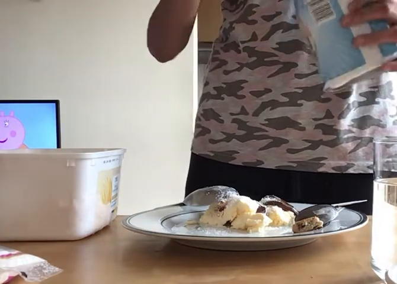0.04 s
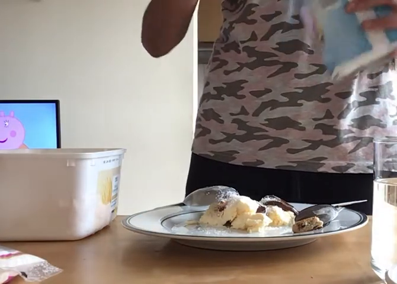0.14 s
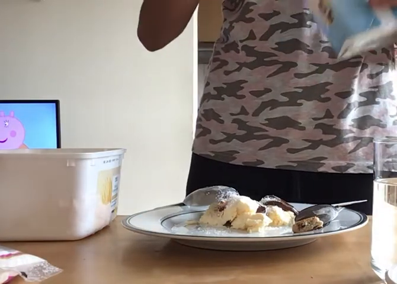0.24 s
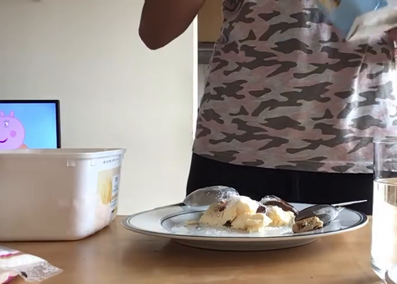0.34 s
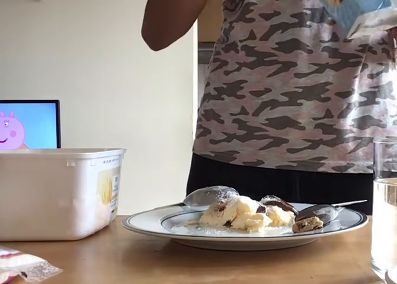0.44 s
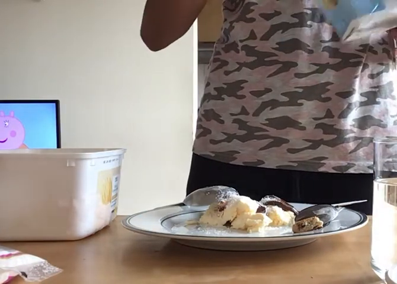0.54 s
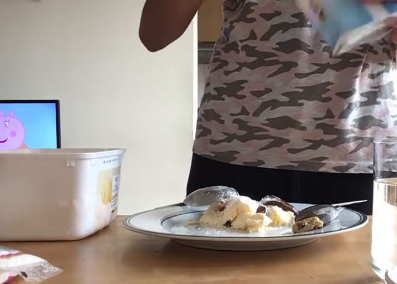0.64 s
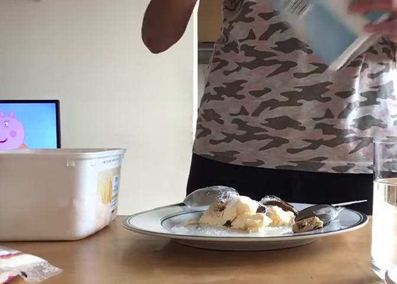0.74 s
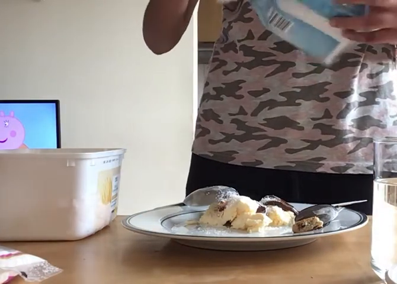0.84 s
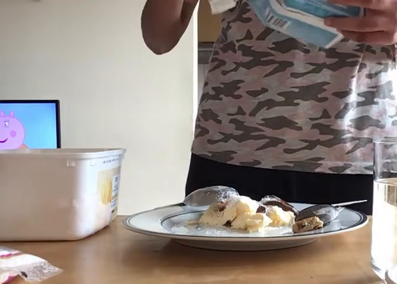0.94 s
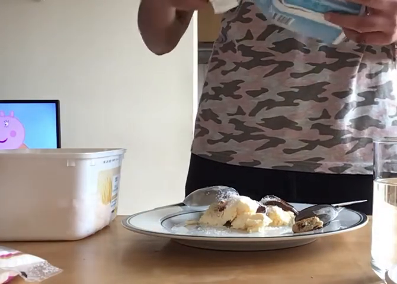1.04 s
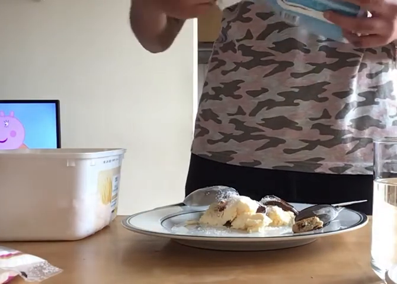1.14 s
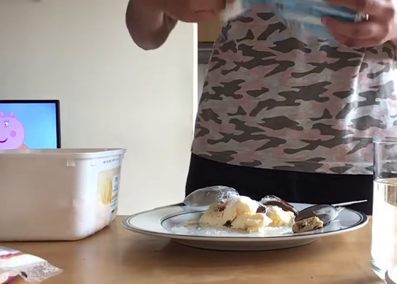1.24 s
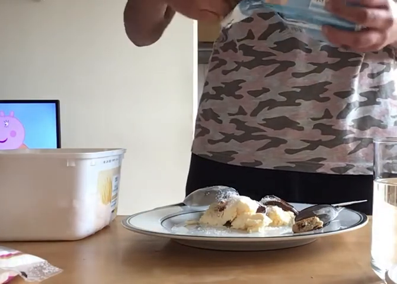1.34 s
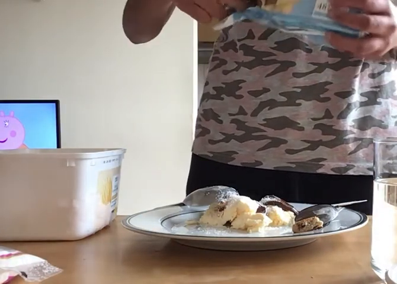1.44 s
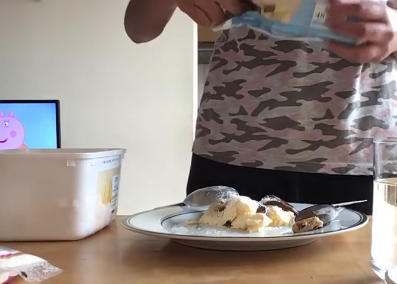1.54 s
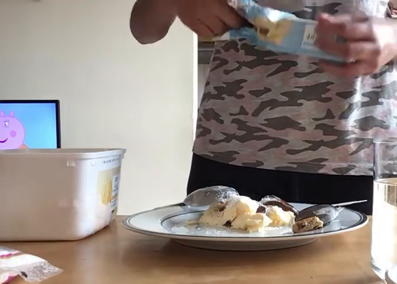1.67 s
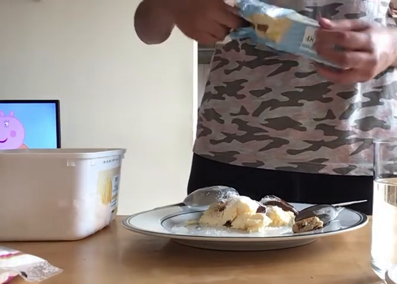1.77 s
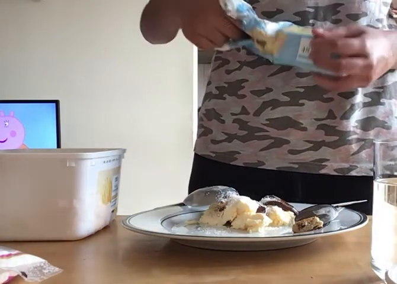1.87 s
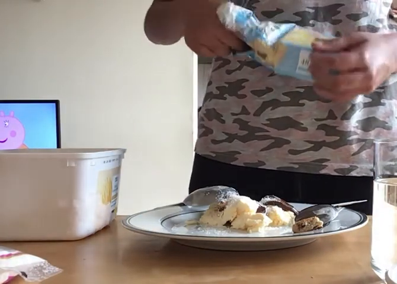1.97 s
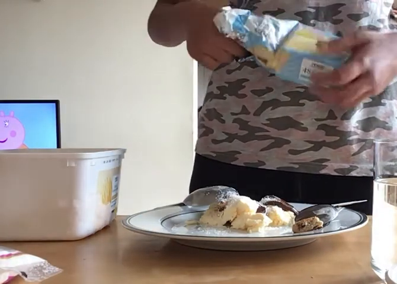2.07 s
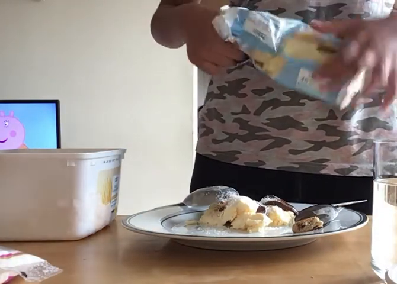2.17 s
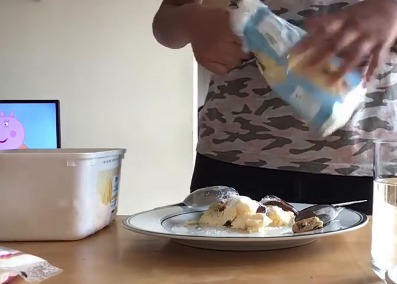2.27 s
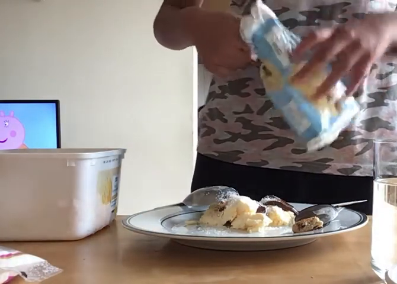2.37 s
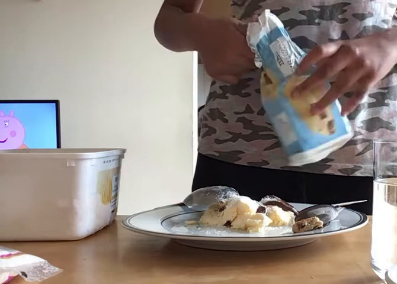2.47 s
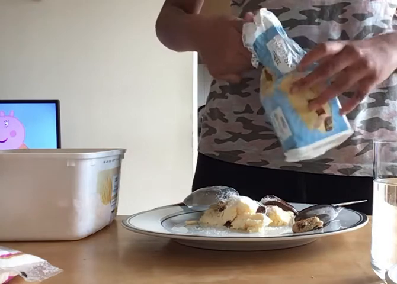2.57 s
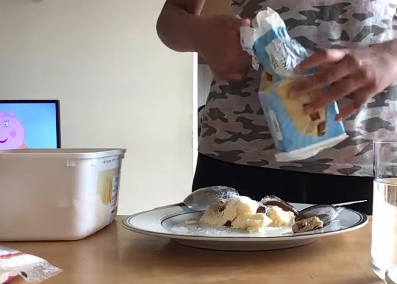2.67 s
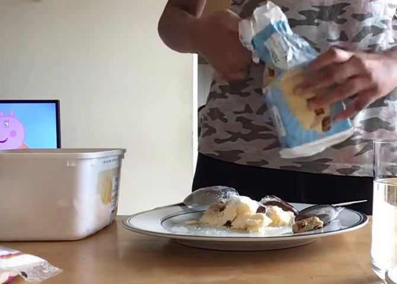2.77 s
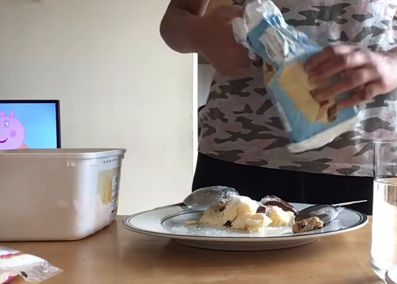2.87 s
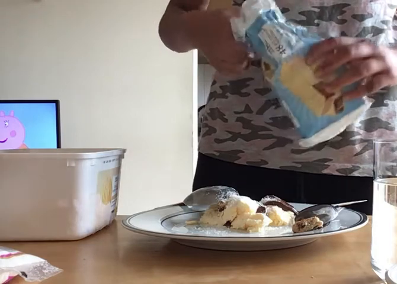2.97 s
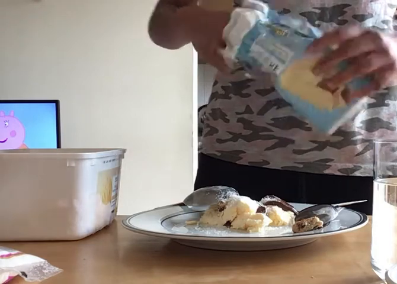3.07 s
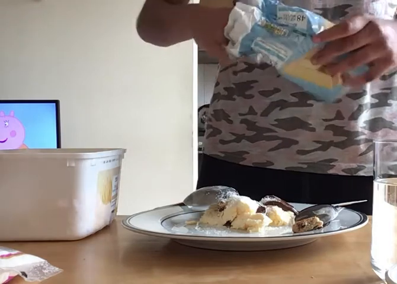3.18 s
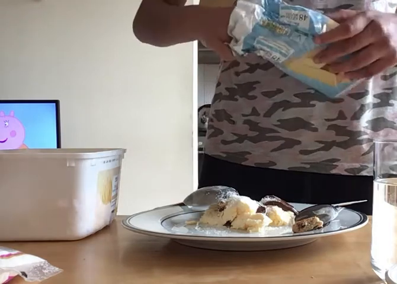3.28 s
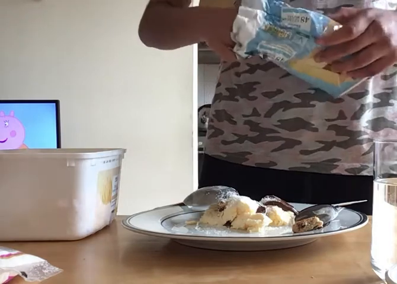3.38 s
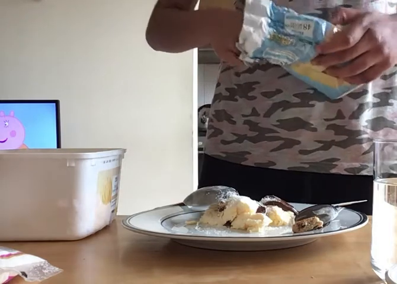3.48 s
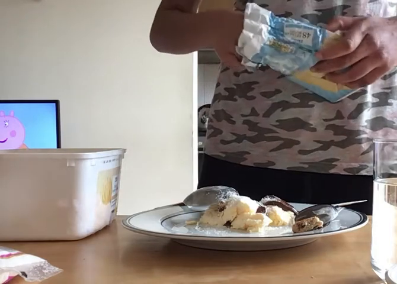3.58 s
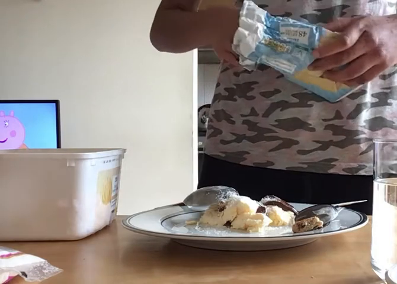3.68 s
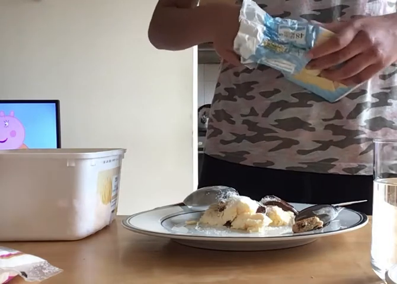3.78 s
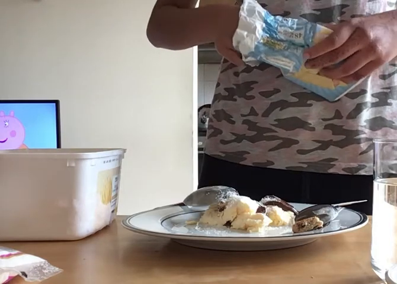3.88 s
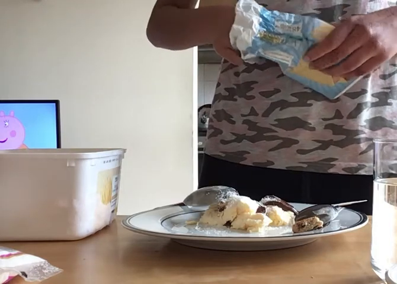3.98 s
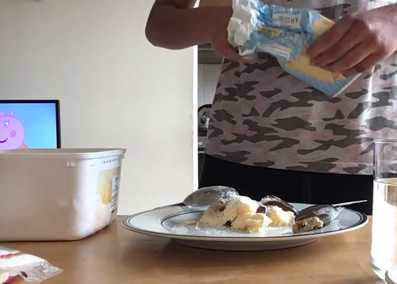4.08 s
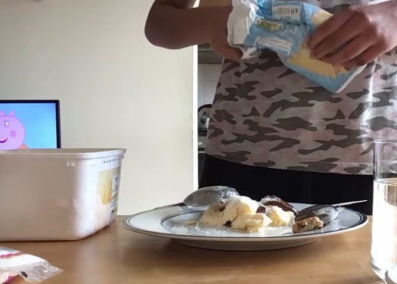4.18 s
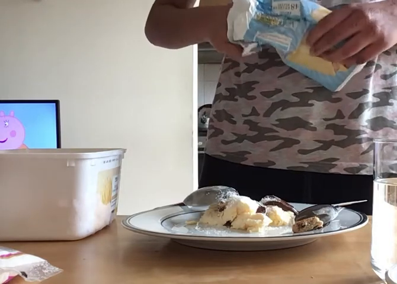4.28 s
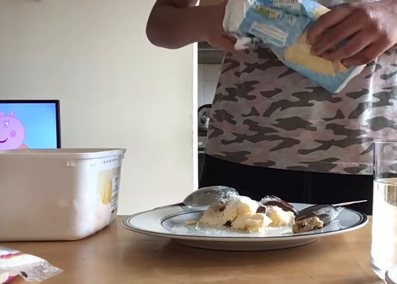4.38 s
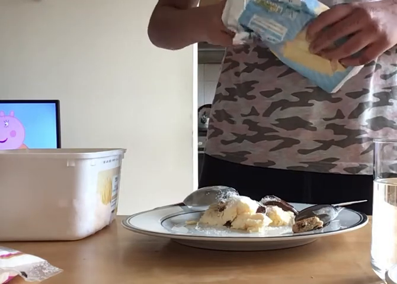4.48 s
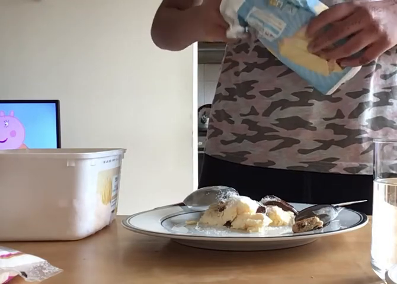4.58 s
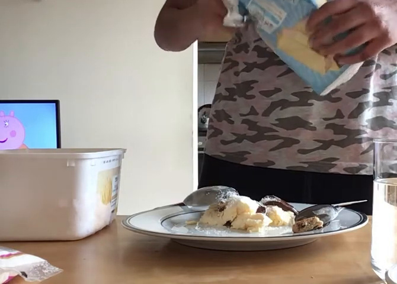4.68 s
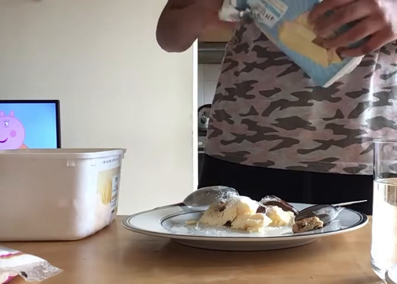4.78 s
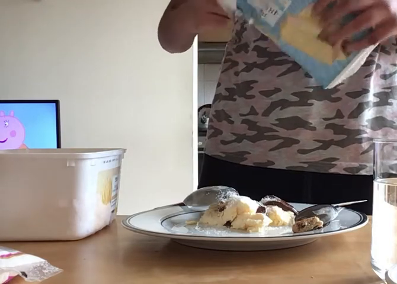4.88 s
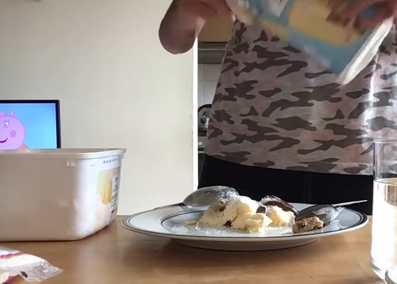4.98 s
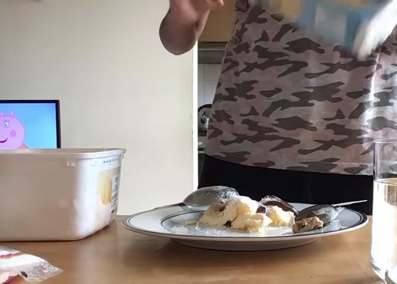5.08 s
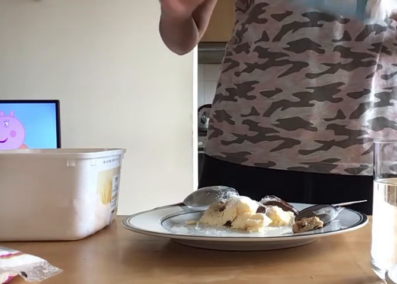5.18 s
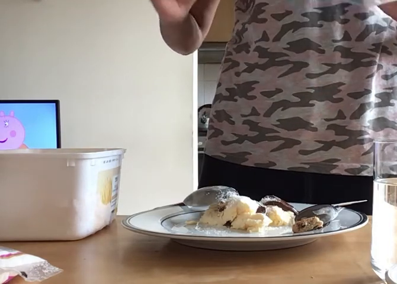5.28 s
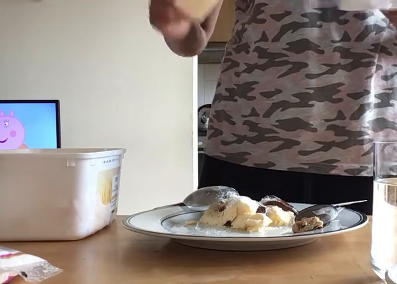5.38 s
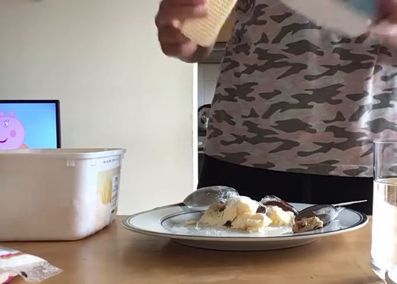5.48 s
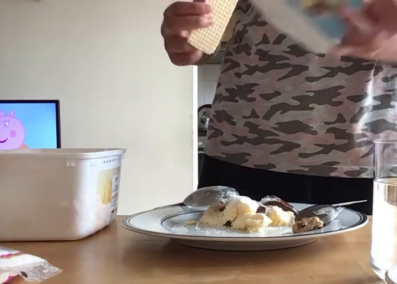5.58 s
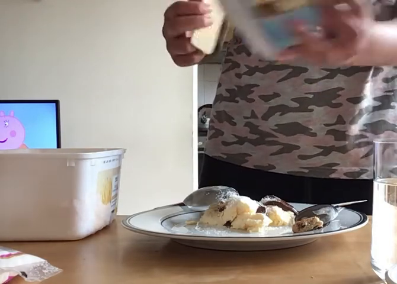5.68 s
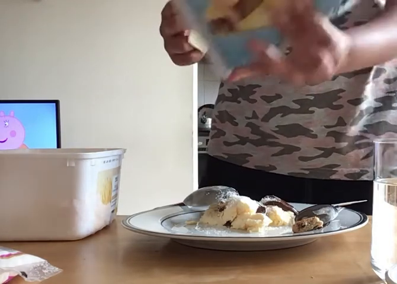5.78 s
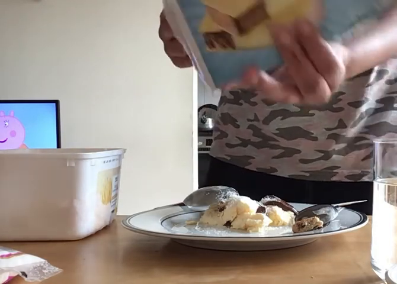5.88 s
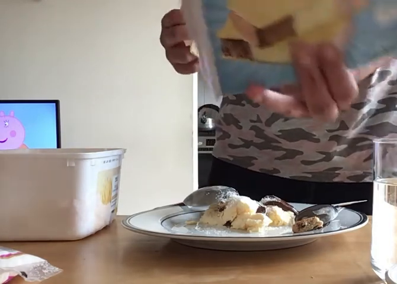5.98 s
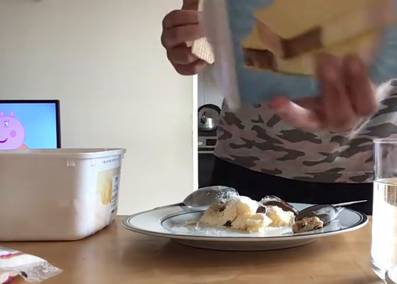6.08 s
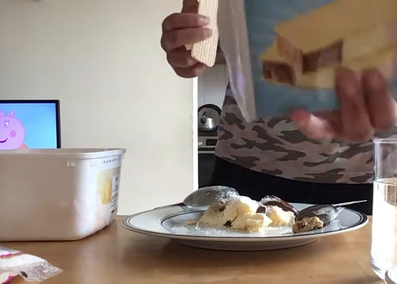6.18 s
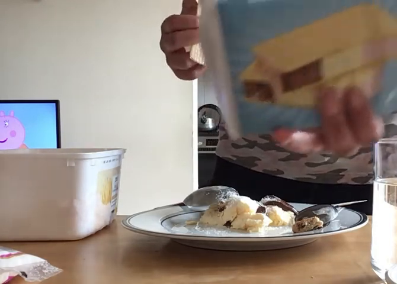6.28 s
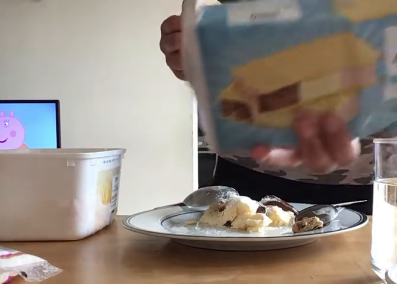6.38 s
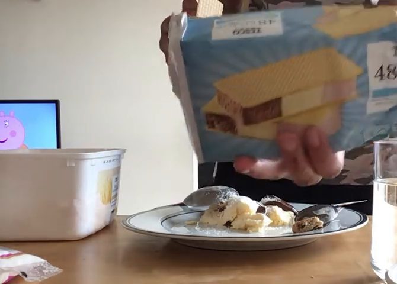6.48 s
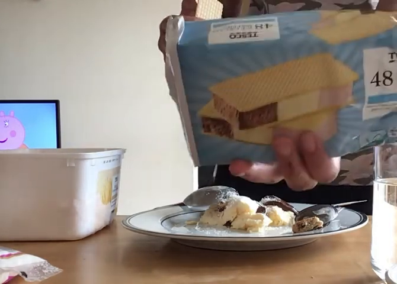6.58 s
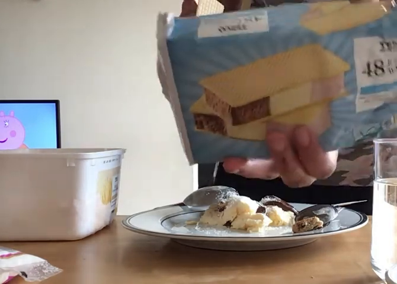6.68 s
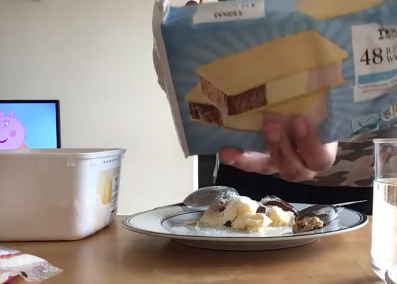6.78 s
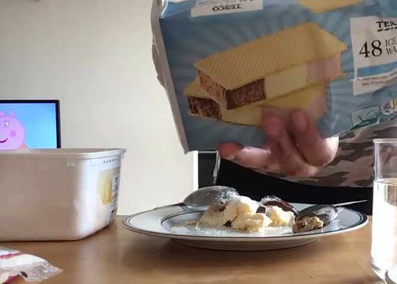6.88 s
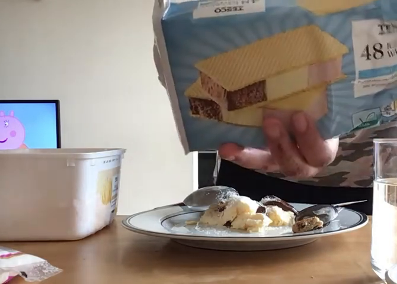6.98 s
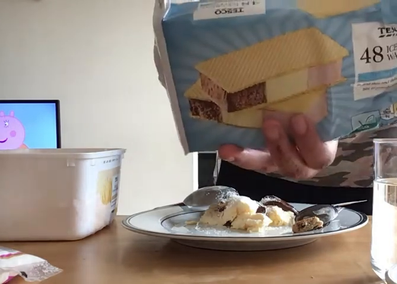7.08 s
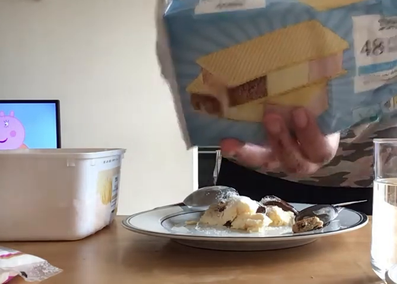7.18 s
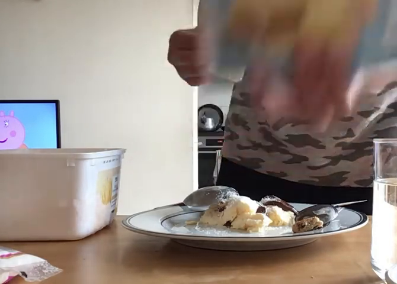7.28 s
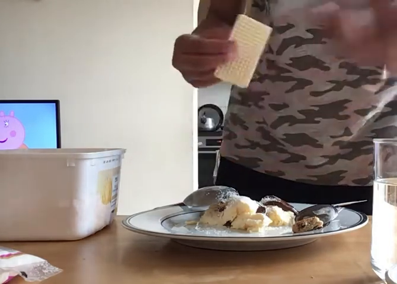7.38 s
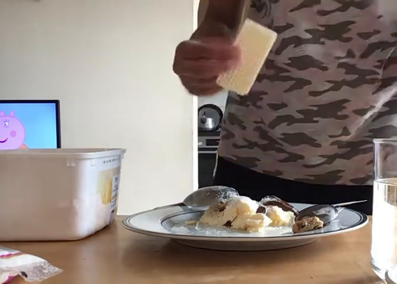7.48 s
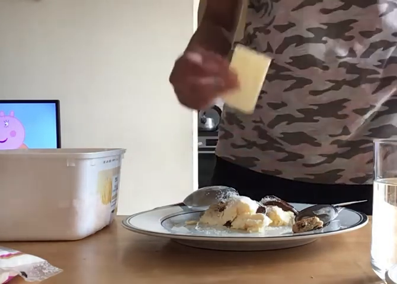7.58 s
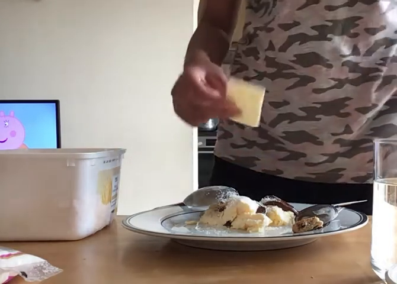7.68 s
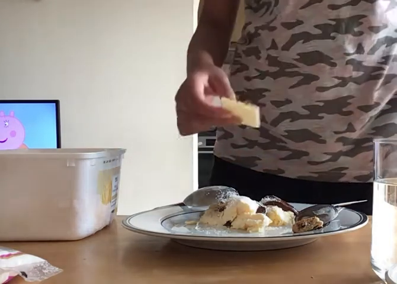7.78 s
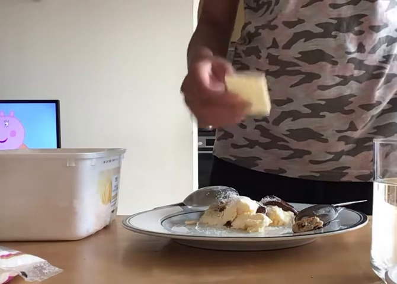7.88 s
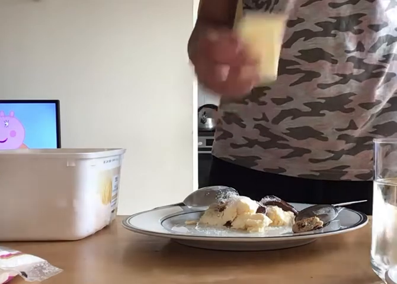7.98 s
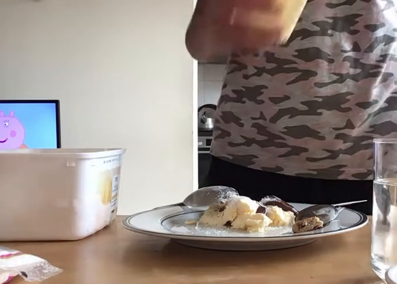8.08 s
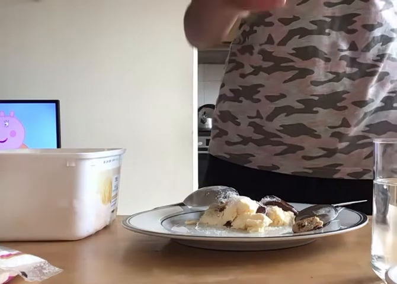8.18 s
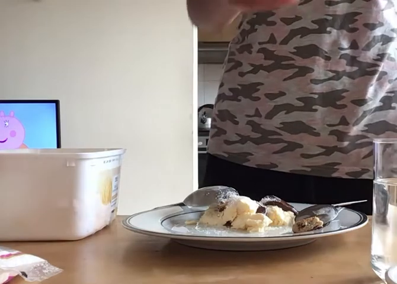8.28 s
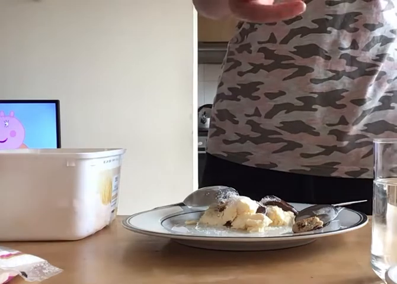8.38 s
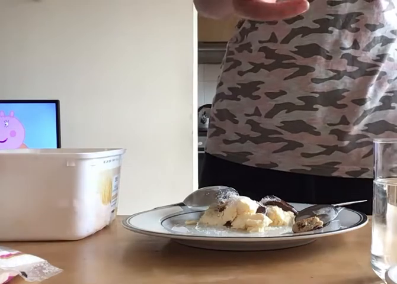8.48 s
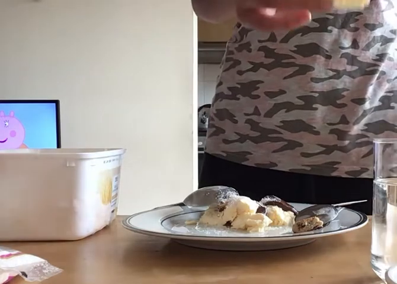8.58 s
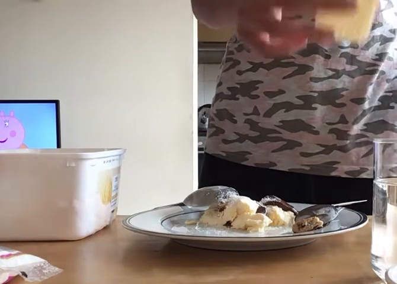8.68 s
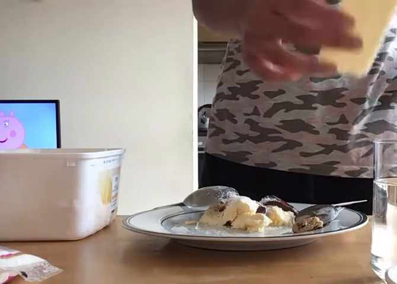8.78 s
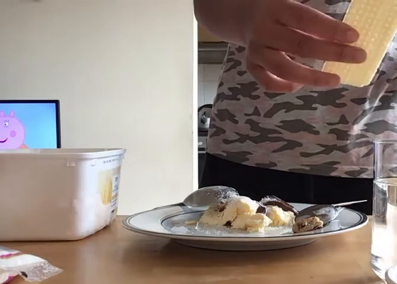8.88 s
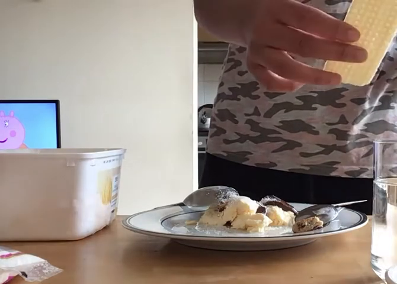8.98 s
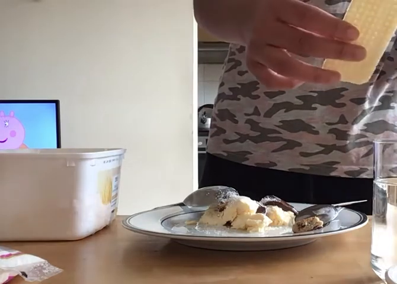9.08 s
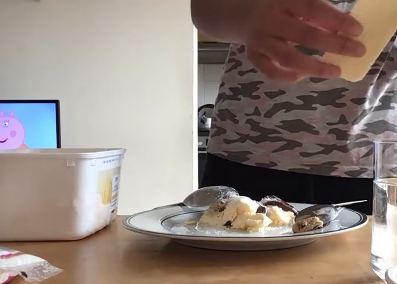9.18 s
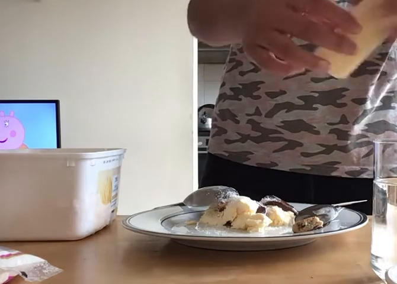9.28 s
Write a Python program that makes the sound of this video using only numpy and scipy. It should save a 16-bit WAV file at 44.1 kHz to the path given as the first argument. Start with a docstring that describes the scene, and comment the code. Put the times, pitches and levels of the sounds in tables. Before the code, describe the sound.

A crisp plastic packet crackles and snaps in dense uneven bursts in a small kitchen, then quiets to sparse dry wafer ticks and soft bumps.

```python
"""Opening a plastic wafer packet

A packet is twisted open over a kitchen table: creases buckle as noise-excited resonant snaps, showers of
small bursts crackle, and the film's panels pop and rustle below them. Then it is waved about and put aside,
and a dry wafer ticks and cracks, with soft bumps made of decaying partials. Random echoes give a small room;
shaped noise gives its steady low hum and hiss."""
import sys
import numpy as np
from scipy import signal
from scipy.fft import rfft, irfft, next_fast_len
from scipy.io import wavfile
from scipy.ndimage import uniform_filter1d, map_coordinates

SR = 44100
rng = np.random.default_rng(int(sys.argv[2]) if len(sys.argv) > 2 else 0)


def generate_wav(signal):
    """Clip the signal to [-1, 1] and save it as 16-bit WAV at the path in sys.argv[1]."""
    frames = np.transpose(np.atleast_2d(signal))
    scaled = np.clip(frames, -1, 1) * 32767
    pcm = np.round(scaled).astype(np.int16)
    wavfile.write(sys.argv[1], SR, pcm)


N = 411894  # samples


def amp(db):
    """Logarithmic level: decibels to amplitude gain."""
    return 10 ** (np.asarray(db) / 20)


def unit(x):
    """Normalization: scale to rms 1."""
    return x / np.sqrt(np.mean(x ** 2) + 1e-20)


def along(points, hz):
    """Logarithmic frequency scale: interpolate (frequency_hz, value) points."""
    point_hz, values = np.transpose(points)
    return np.interp(np.log(hz + 1), np.log(point_hz + 1), values)


def curve(rows):
    """Linear interpolation in time: (start_s, value) rows to one value per sample."""
    return np.interp(np.arange(N) / SR, *np.transpose(rows))


def wobble(rate):
    """Slow random modulation: Gaussian knots, rate of them a second, joined by straight lines."""
    knots = rng.standard_normal(int(N * rate / SR) + 4)
    return map_coordinates(knots, [np.arange(N) * rate / SR], order=1)


def filtered(x, response):
    """Linear filtering: multiply the spectrum of x by a response of frequency."""
    padded = next_fast_len(N + SR // 2)
    hz = np.fft.rfftfreq(padded, 1 / SR)
    return irfft(rfft(x, padded) * response(hz), padded)[:N]


def add(track, s, sound):
    """Superposition: mix a sound into the track at s seconds, not before its start."""
    room = track[max(round(s * SR), 0):][:len(sound)]
    room += sound[:len(room)]


def bursts(spectrum, t60, vary_db, count, even=0, size=2048):
    """Impulsive excitation of a resonant body: noise kicks, each through its own random variant of spectrum.

    Each burst has the energy of 1 ms at rms 1; even (0-1) smooths out the ripple of its kick."""
    hz, t = np.fft.rfftfreq(size, 1 / SR), np.arange(size) / SR
    knots_hz = np.geomspace(100, 16000, 26)
    variation = np.array([np.interp(hz, knots_hz, row) for row in rng.standard_normal((count, len(knots_hz)))])
    decay = np.log(1000) * t / t60
    envelope = decay * np.exp(-decay)  # a buckle spreads, then dies
    kicks = rfft(rng.standard_normal((count, size)) * envelope)
    ripple = np.abs(kicks) + np.abs(kicks).mean() / 10
    gain = amp(along(spectrum, hz) + vary_db * variation)
    cepstrum = irfft(np.log(gain + 1e-6) - even * np.log(ripple))
    body = np.exp(rfft(2 * cepstrum[:, :size // 2], size))  # causal: nothing sounds before the blow
    rings = irfft(kicks * body)
    return rings / np.linalg.norm(rings, axis=1, keepdims=True) * np.sqrt(SR / 1000)


def shower(spectrum, t60, vary_db, rate, spread_db, clump_db, count=127):
    """Poisson-like process: random small buckles on many facets, in clumps, evened to a rms of about 1."""
    facets = bursts(spectrum, t60, vary_db, count=count)
    sizes = amp(spread_db * np.clip(rng.standard_normal(N), -2, 2) + clump_db * wobble(50))
    x = np.zeros(N)
    for i in np.flatnonzero(rng.random(N) < rate / SR):
        add(x, i / SR, sizes[i] * facets[i % count])
    power = uniform_filter1d(uniform_filter1d(x ** 2, size=2000), size=2000)
    return x / np.sqrt(np.abs(power) + 1e-9)


def strokes(rows):
    """Gaussian envelopes: gain of smooth swells given as (middle_s, half_length_s, level_db)."""
    t = np.arange(N) / SR
    return sum(amp(db) * np.exp(-((t - s) / half) ** 2 / 2) for s, half, db in rows)


# spectrum of the quiet kitchen: frequency_hz, density_db (per Hz)
AIR_SPECTRUM = [(45, -15), (65, -8), (100, -5), (135, -0.5), (175, -6.5), (390, -10.5), (620, -17),
                (1100, -25.5), (4500, -32), (6300, -27.5), (9000, -27), (16000, -35.5)]
AIR_DB = -54


def air():
    """Stationary coloured noise: a low room hum with a faint hiss, wavering slightly."""
    noise = filtered(rng.standard_normal(N), lambda hz: amp(along(AIR_SPECTRUM, hz)))
    return amp(AIR_DB + 0.89 * wobble(2.96)) * unit(noise)


# reverberation of the kitchen: frequency_hz, t60_s
KITCHEN_DECAY = [(150, 0.3), (600, 0.36), (3000, 0.51), (9000, 0.32)]
DULL_HZ = 9000  # reflections lose their treble above this
WALL_DELAY_S = 0.007  # the nearest wall answers this much later


def kitchen(x, table_db, walls_db, count=24):
    """Reverberation: the table scatters quickly, the walls give strong early echoes and a decaying tail.

    Both answers are drawn afresh at random for each of count equal spans, so the echoes vary in colour."""
    out = x.copy()
    for part in np.array_split(np.arange(N), count):
        hz, t, bands = signal.stft(rng.standard_normal(SR // 3), SR, nperseg=256)
        decay = amp(-60 * t / along(KITCHEN_DECAY, hz)[:, None])
        tail = signal.istft(bands * decay, SR, nperseg=256)[1]
        t = np.arange(len(tail)) / SR
        early = 1 + 1.24 * np.exp(-t / 0.012)
        walls = tail * (t > WALL_DELAY_S) * early
        table = rng.standard_normal(len(t)) * np.exp(-t / 0.0054) * (1 - np.exp(-t / 0.0011))
        answer = amp(walls_db) * walls / np.linalg.norm(walls) + amp(table_db) * table / np.linalg.norm(table)
        answer = signal.lfilter(*signal.butter(1, DULL_HZ, fs=SR), answer)
        add(out, part[0] / SR, signal.fftconvolve(x[part], answer))
    return out


# low, soft rustle of moving arms and clothes: middle_s, half_length_s, level_db
ARM_MOVES = [(6.24, 0.022, -55), (7.46, 0.1, -52.5), (7.695, .016, -47.5), (8.145, .02, -49)]
# spectrum of rubbing cloth: frequency_hz, density_db (per Hz)
CLOTH_SPECTRUM = [(40, -12), (150, 0), (600, -11), (3000, -45)]


def cloth():
    """Friction noise: sleeves and shirt give a dull rush with each arm movement."""
    rush = unit(filtered(rng.standard_normal(N), lambda hz: amp(along(CLOTH_SPECTRUM, hz))))
    return strokes(ARM_MOVES) * rush


# hollow pops of the packet and soft bumps of the hands: start_s, level_db, pitch_hz
# the last five rows are one heavy bump that stumbles and settles
BUMPS = [(.79, -32.5, 326), (.843, -33, 560), (1.511, -26.5, 456), (2.04, -23.5, 472), (2.331, -16, 620),
         (2.465, -20.5, 592), (2.489, -18, 667), (2.72, -27, 656), (3.712, -22.5, 620), (3.755, -20, 650),
         (4.03, -22, 833), (4.53, -33, 215), (5.035, -31, 214), (5.659, -38.5, 290), (6.01, -37.5, 279),
         (7.203, -33, 677), (7.21, -46, 71), (7.237, -39, 530), (8.118, -37, 225), (8.253, -41, 128),
         (9.006, -27, 280), (9.017, -28.5, 205), (9.031, -32.5, 112), (9.048, -33, 190), (9.076, -39, 200)]


def bumps():
    """Damped partials: a flexing panel or soft contact thuds with two overtones; higher pitches die sooner."""
    x, t = np.zeros(N), np.arange(SR // 4) / SR
    for s, db, hz in BUMPS:
        turns = hz * t  # cycles of the lowest partial
        phase = 2 * np.pi * turns
        tone = np.sin(phase) + 0.52 * np.sin(1.35 * phase) + 0.31 * np.sin(2.06 * phase)
        envelope = np.exp(-turns / 1.75) * (1 - np.exp(-turns / 0.6))
        add(x, s, amp(db + 4) * tone * envelope)
    return x


# short granular scrapes: middle_s, half_length_s, level_db
SCUFFS = [(.787, .005, -39.5), (5.385, 0.0089, -53.5), (5.643, 0.011, -51), (7.405, 0.016, -52),
          (8.025, 0.021, -48.5), (8.233, 0.011, -50.5), (8.318, 0.018, -44.5), (8.36, 0.035, -55),
          (6.226, .019, -57.5)]
# spectrum of a dry scrape: frequency_hz, density_db (per Hz)
SCRAPE_SPECTRUM = [(100, -7), (400, 5.5), (800, -3), (1600, -7), (4200, -13), (9000, -11), (15000, -30)]
# bright swells of sliding film as the wafer is drawn out: middle_s, half_length_s, level_db
SLIDES = [(1.065, 0.037, -45.5), (4.897, 0.037, -35.5), (5.015, 0.0058, -29.5), (5.637, .005, -43.5)]
# spectrum of film dragged over wafer: frequency_hz, density_db (per Hz)
SLIDE_SPECTRUM = [(200, -0.5), (630, 4.5), (900, -9.5), (1300, 0), (2100, -15), (3000, 3), (4000, 0.5),
                  (5700, -14), (8700, 5.5), (11000, -11), (16000, -27)]


def scuffs():
    """Granular friction: swells of fine grains, dull for scrapes, a packed bright rush where the film slides."""
    scrape = shower(SCRAPE_SPECTRUM, t60=0.0071, vary_db=2.5, rate=1100, spread_db=1.5, clump_db=3.0)
    slide = shower(SLIDE_SPECTRUM, t60=0.0028, vary_db=1.0, rate=1200, spread_db=7.0, clump_db=-1.5)
    return strokes(SCUFFS) * scrape + strokes(SLIDES) * slide


# dry cracks and taps of wafer and packet: start_s, level_db, ring_db and body_db (relative to level_db)
CRACKS = [(5.4075, -40, -35, -30), (5.778, -41.5, -30, -13), (5.9152, -47.5, -2.5, -7),
          (5.9617, -22.5, -15, -29), (6.6206, -28, -30, -18.5), (6.8671, -51.5, -9, -4),
          (6.974, -57, -4, -2), (7.203, -38.5, -15, -10), (7.2455, -36.5, -17, -22),
          (7.727, -39.5, -24, -19), (7.799, -43, -29, -29), (8.0008, -28, -13.5, -3),
          (8.105, -43, -7, -8.5), (8.303, -39.5, -19, -6.5), (8.328, -32.5, -31, -25),
          (8.865, -42, -15, -3)]
# bright click of a crack or a crease: frequency_hz, density_db (per Hz)
CLICK_SPECTRUM = [(1000, -50), (3000, -16), (5000, -8), (6300, -4), (7600, -3), (8800, 4.5), (10000, -2.5),
                  (11200, -14.5), (14400, -5), (16000, -25)]
# ring of the wafer: frequency_hz, density_db (per Hz)
WAFER_RING = [(1500, -28), (2250, -0.5), (2850, 0.5), (3800, -16), (4700, -12), (9000, -44)]
# duller body of the wafer: frequency_hz, density_db (per Hz)
WAFER_BODY = [(150, -8), (320, -4.5), (750, -1.5), (1300, -6.5), (1900, -9.5), (4000, -14.5), (8000, -50)]


def cracks():
    """Brittle fracture: each dry crack has a sharp edge, a short broad ring and a duller body."""
    x, count = np.zeros(N), len(CRACKS)
    edges = bursts(CLICK_SPECTRUM, t60=0.003, vary_db=1, count=count, even=1)
    rings = bursts(WAFER_RING, t60=0.0025, vary_db=1, count=count, even=0.9)
    bodies = bursts(WAFER_BODY, t60=0.017, vary_db=1.5, count=count, even=0.5)
    for (s, db, ring_db, body_db), edge, ring, body in zip(CRACKS, edges, rings, bodies):
        sharp = amp(db - 1.0) * edge
        add(x, s, sharp + amp(db + ring_db + 9.5) * ring + amp(db + body_db + 9.5) * body)
    return x


# creases that snap through one by one: start_s, level_db (click), pop_db (panel, relative to the click)
CREASES = [(.055, -23, -23), (0.069, -22.5, -33), (.125, -20.5, -20), (.275, -31, -19),
           (.325, -24.5, -19.5), (0.3493, -26, -27), (0.404, -16.5, -18), (0.4538, -16.5, -18),
           (.638, -23, -38), (0.7472, -26.5, -15.5), (0.8225, -16.5, -23), (0.897, -21.5, -39),
           (1.057, -25, -23), (1.2454, -14.5, -21.5), (1.315, -17.5, -41), (1.4303, -13.5, -21),
           (1.446, -13, -25), (1.4656, -13.5, -19), (1.513, -12, -36), (1.5304, -17, -27),
           (1.613, -15.5, -42), (1.6487, -20, -25), (1.763, -20, -32), (1.8307, -19.5, -30),
           (1.958, -16.5, -18), (2.0396, -15.5, -21), (2.114, -18.5, -16.5), (2.139, -18, -20),
           (2.1984, -16, -36), (2.257, -12, -25), (2.2687, -15, -19), (2.3097, -12, -18.5),
           (2.3184, -12, -11), (2.332, -15, -19), (2.339, -17, -24), (2.4627, -14.5, -26),
           (2.4905, -13, -21), (2.5976, -16, -27), (2.6408, -15.5, -11.5), (2.7374, -25.5, -22),
           (2.7841, -26.5, -10.5), (2.921, -16.5, -36), (2.9629, -15.5, -20), (2.975, -18, -24),
           (3.008, -17.5, -23), (3.0774, -23, -31), (3.1607, -14.5, -32), (3.1662, -10.5, -29),
           (3.274, -11.5, -19.5), (3.315, -13.5, -35), (3.3559, -19.5, -18), (3.4399, -15, -20.5),
           (3.456, -16, -33), (3.477, -14.5, -27), (3.5213, -10.5, -24.5), (3.537, -16, -19),
           (3.593, -20, -32), (3.613, -12, -26), (3.682, -20, -27), (3.7126, -21, -20), (3.7393, -18, -15),
           (3.784, -10.5, -21), (3.8773, -15.5, -30), (3.953, -23, -20), (3.9977, -13, -16.5),
           (4.03, -14.5, -18), (4.066, -18.5, -23), (4.161, -16, -26), (4.198, -18.5, -33),
           (4.2369, -18.5, -28), (4.2712, -15.5, -15.5), (4.3873, -16.5, -37), (4.4874, -11.5, -21.5),
           (4.5395, -21, -21), (4.7083, -21, -34), (4.7315, -18.5, -38), (4.7383, -14, -24),
           (4.819, -20, -26), (4.835, -19, -24), (4.8525, -19, -28), (4.92, -14.5, -31),
           (4.9396, -13.5, -20.5), (5.0145, -12, -25), (5.143, -24.5, -40), (5.552, -32, -30),
           (5.642, -27.5, -18)]
# ring of the film around a crease: frequency_hz, density_db (per Hz)
FOLD_SPECTRUM = [(400, -33), (1000, -6), (1550, -11), (1950, -2.5), (2350, -6), (3000, 0), (3900, 0.5),
                 (4700, -9.5), (7000, -4), (14000, -20)]
# the packet's walls: frequency_hz, density_db (per Hz)
PANEL_SPECTRUM = [(60, -28.5), (150, -9), (250, -6.5), (450, -0.5), (620, 0.5), (850, -7.5), (1300, -12),
                  (2000, -14.5), (4000, -21.5)]
# slack film rings more freely than film twisted tight: start_s, ring_db
SLACK = [(0, 4), (.9, 4), (1.4, -1), (2.4, 1.5), (3.5, -2), (4.4, 1.5), (4.75, 4), (5.2, 6.5)]
RING_DB, RING_GROWS = -22, 0.78  # ring at click level 0 before slack; dB of ring per dB of click


def creases():
    """Snap-through buckling: two quick steps release energy, ring the film around and pop the panel behind."""
    x, count = np.zeros(N), len(CREASES)
    clicks = bursts(CLICK_SPECTRUM, t60=0.0032, vary_db=4, count=count, even=0.2)
    rings = bursts(FOLD_SPECTRUM, t60=0.0028, vary_db=5, count=count)
    pops = bursts(PANEL_SPECTRUM, t60=0.014, vary_db=3.5, count=count, even=0.3)
    seconds = bursts(CLICK_SPECTRUM, t60=0.003, vary_db=3.5, count=count)
    lags_s = rng.uniform(0.00054, 0.0025, count)
    for row, click, ring, pop, second, lag in zip(CREASES, clicks, rings, pops, seconds, lags_s):
        s, db, pop_db = row
        ring_db = RING_DB + RING_GROWS * db + np.interp(s, *np.transpose(SLACK))
        add(x, s, amp(db - 9.5) * click + amp(ring_db) * ring + amp(db + pop_db + 6.5) * pop)
        add(x, s + lag, amp(db - 16) * second)
    return x


STRAIN_DB, STRAIN_S = -4.5, 0.011  # depth of one lull and its time constant


def strain():
    """Elastic loading: gain of the crackle and rustle, with a lull while each big crease is loaded."""
    db, t = np.zeros(N), np.arange(-(SR // 16), 0) / SR
    lull = STRAIN_DB * np.exp(t / STRAIN_S)
    for s, *_ in CREASES:
        add(db, s + t[0], lull)
    return amp(db)


ATTACK_S, RELEASE_S = 0.037, 0.034  # the film takes up the strain, then relaxes


def squeeze(start, length):
    """Loading and relaxation: gain that builds up to the start, holds for the length and decays."""
    t = np.arange(N) / SR - start
    return np.clip(1 + t / ATTACK_S, 0, 1) * np.exp(-np.clip((t - length) / RELEASE_S, 0, 20))


# squeezes and twists: start_s, length_s, level_db (crackle), panel_db (rustle, relative to the crackle)
SQUEEZES = [(0.0, 0.055, -47, 1), (0.268, 0.1, -45.5, -6.5), (0.41, 0.04, -39.5, -7),
            (0.793, 0.055, -45.5, -11), (1.014, 0.088, -45.5, -3), (1.234, 0.091, -40, -7.5),
            (1.412, 0.11, -33.5, -4.5), (1.63, 0.092, -42.5, -2), (1.772, 0.097, -39, -5),
            (1.915, 0.53, -40.5, -5), (2.239, 0.03, -34.5, -4), (2.335, 0.012, -33, -0.5),
            (2.436, 0.063, -37.5, -13), (2.646, 0.011, -34, -3), (2.725, 0.12, -48.5, -2),
            (2.904, 0.13, -37, -2), (3.093, 0.13, -39, -4), (3.285, 0.11, -37.5, -4),
            (3.467, 0.15, -34, -3), (3.673, 0.19, -35.5, -6), (3.971, 0.018, -39.5, -7.5),
            (4.043, 0.031, -37, -6), (4.144, 0.28, -48.5, -10), (4.49, 0.071, -43, -2),
            (4.685, 0.13, -41.5, -5.5), (4.818, 0.13, -44, 1), (5.021, 0.041, -45, -1.5)]
# faint stirring of the packet in the hand, between squeezes and afterwards: start_s, level_db (crackle)
HOLD = [(0, -70), (.7, -58), (2.2, -49.5), (2.8, -56.5), (4.4, -46.5), (5.17, -77), (5.5, -67), (6.8, -81),
        (7.45, -67.5), (8.2, -70), (8.6, -80)]
HOLD_RUSTLE_DB = -1  # a loose grip stirs the panels about as much as the creases
JERK_DB, JERKS_PER_S = 4.5, 45  # the film gives way unevenly


def crinkle():
    """Crackling noise: fingers make tiny creases buckle at random while the larger panels flex and rustle."""
    hold_db, slack_db = curve(HOLD), curve(SLACK)
    creasing = amp(hold_db) ** 2  # powers, so that efforts add
    flexing = amp(hold_db + HOLD_RUSTLE_DB) ** 2
    for start, length, db, panel_db in SQUEEZES:
        effort = squeeze(start, length) ** 2
        creasing = creasing + amp(db) ** 2 * effort
        flexing = flexing + amp(db + panel_db) ** 2 * effort
    bright = shower(CLICK_SPECTRUM, t60=0.002, vary_db=3.5, rate=210, spread_db=4.0, clump_db=6.5)
    coarse = shower(FOLD_SPECTRUM, t60=0.003, vary_db=7.0, rate=320, spread_db=5.0, clump_db=4.5)
    rustle = shower(PANEL_SPECTRUM, t60=0.011, vary_db=2.5, rate=300, spread_db=4.0, clump_db=3)
    grip = strain() * amp(JERK_DB * np.tanh(wobble(JERKS_PER_S)))
    crackle = np.sqrt(creasing) * (amp(-4.0) * bright + amp(slack_db - 6.5) * coarse)
    return grip * (crackle + np.sqrt(flexing) * rustle)


def scene():
    """Direct-to-reverberant ratio: the packet is opened at arm's length; the cracks are nearer and drier."""
    packet = kitchen(crinkle() + creases() + scuffs() + bumps(), table_db=-11.0, walls_db=-8.0)
    near = kitchen(cracks(), table_db=-12, walls_db=-13.5)
    return (packet + near + cloth() + air())[None]


TOP_HZ = 16000  # upper band limit


def record(dry):
    """Band limitation: a small microphone loses the deep bass, and a steep cutoff removes the extreme treble."""
    thin = signal.sosfilt(signal.butter(4, 50, "high", fs=SR, output="sos"), dry[0])
    return filtered(thin, lambda hz: 1 / np.sqrt(1 + (hz / TOP_HZ) ** 160))[None]


dry = scene()
out = record(dry)
generate_wav(out)
```